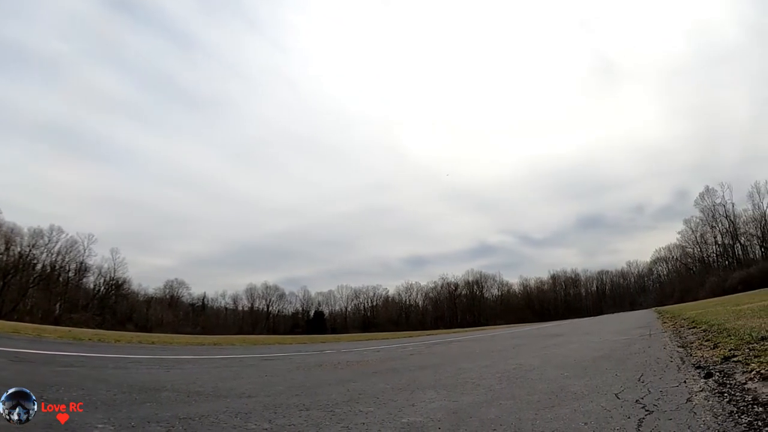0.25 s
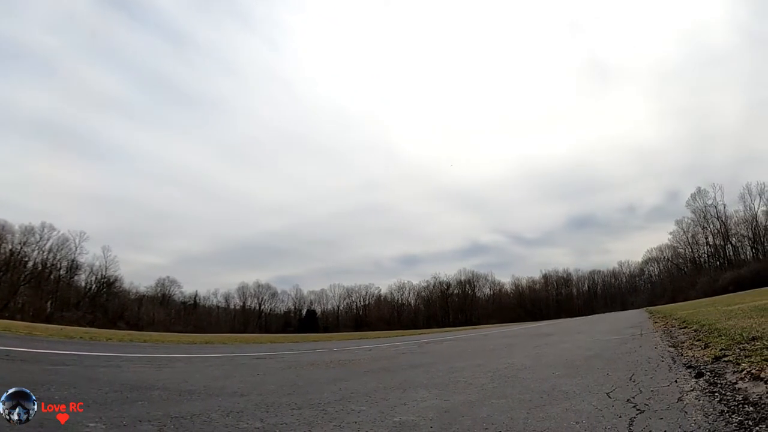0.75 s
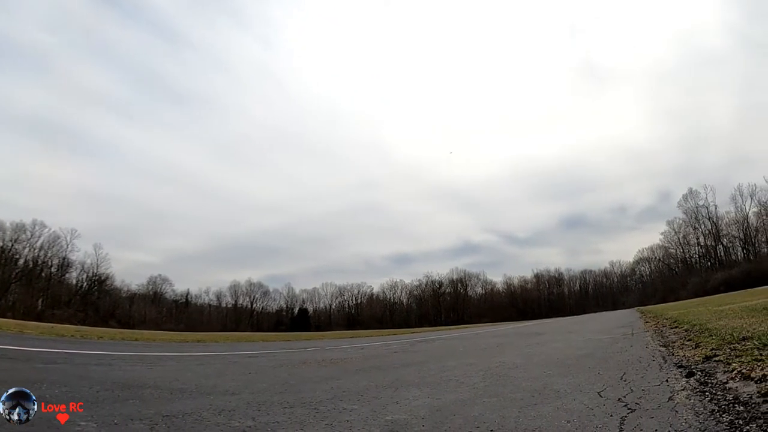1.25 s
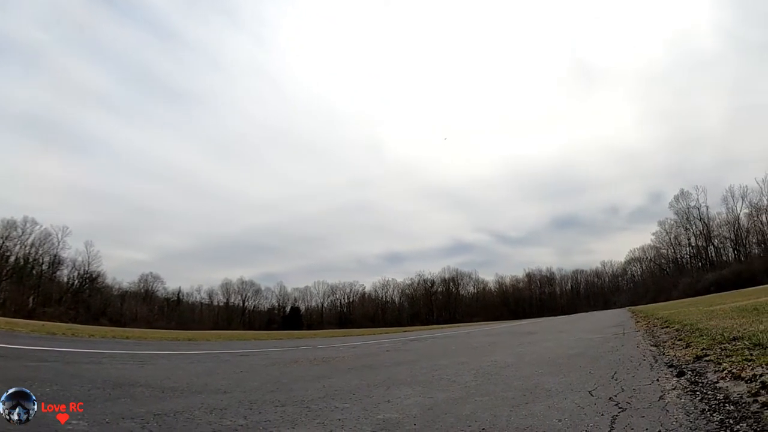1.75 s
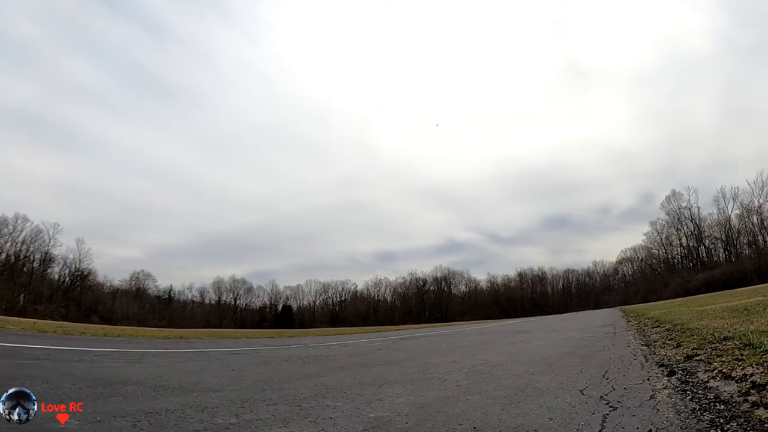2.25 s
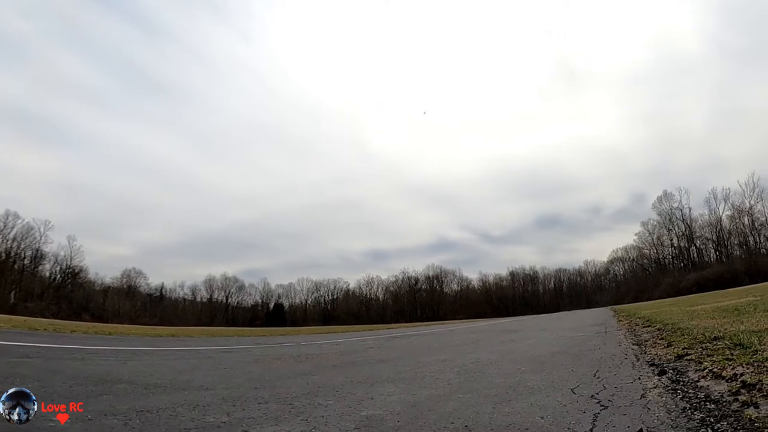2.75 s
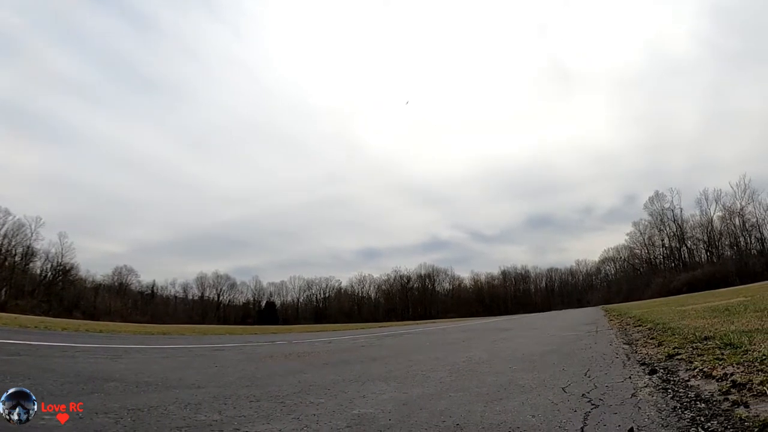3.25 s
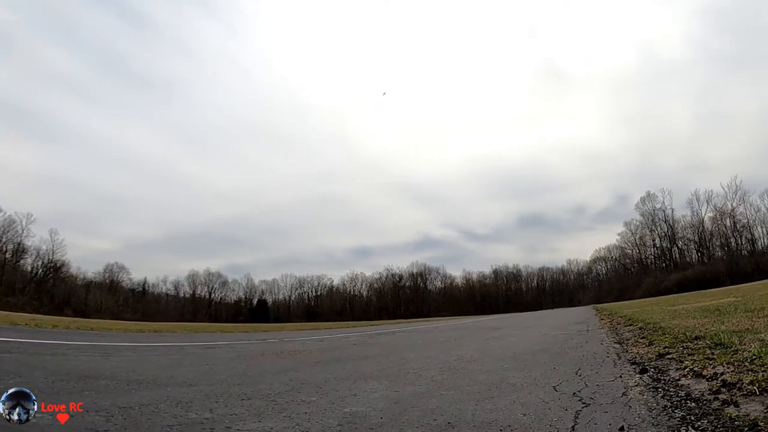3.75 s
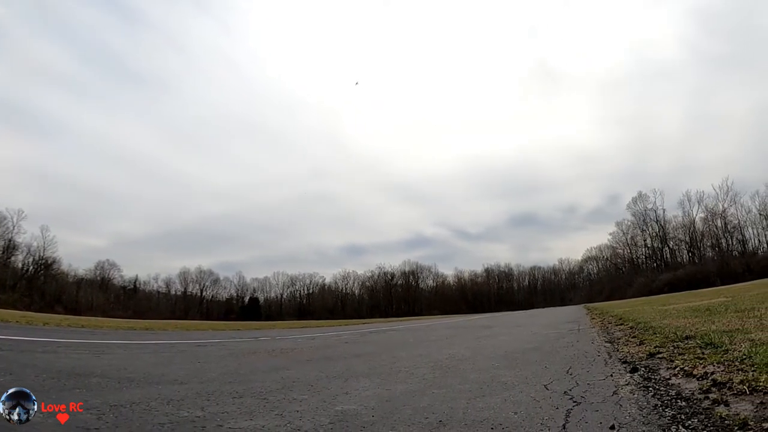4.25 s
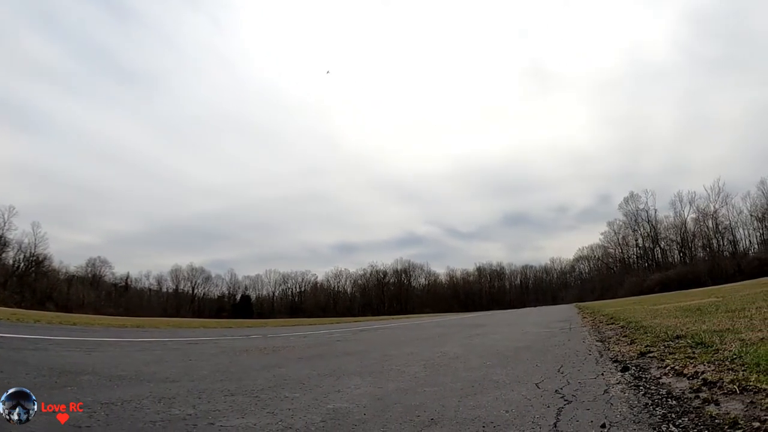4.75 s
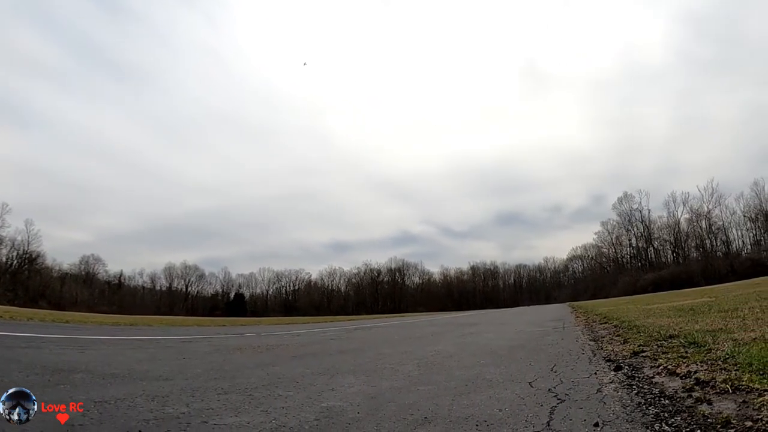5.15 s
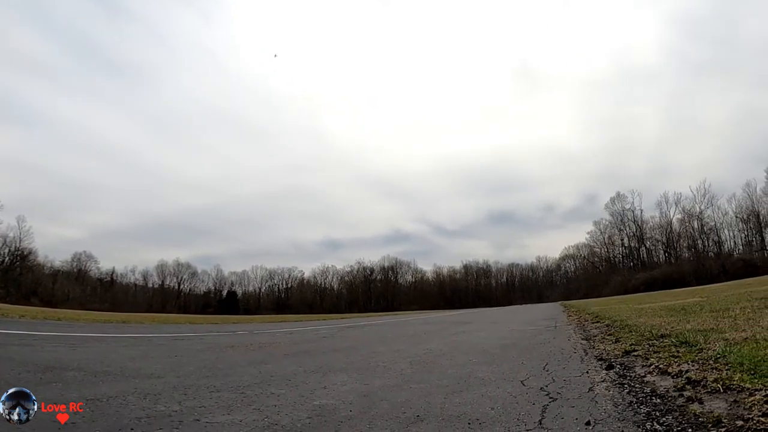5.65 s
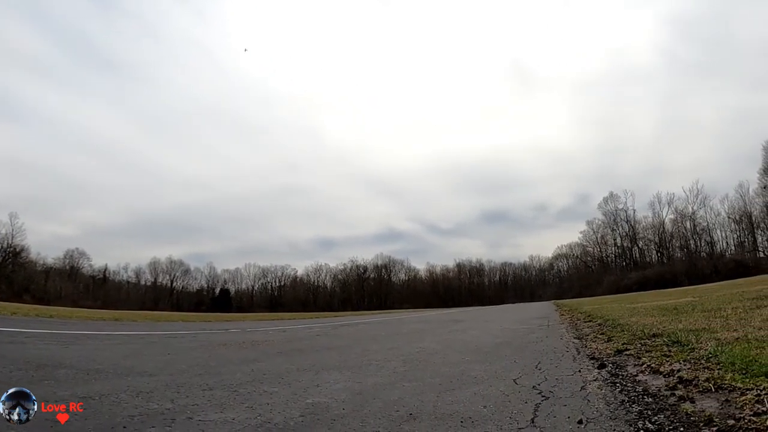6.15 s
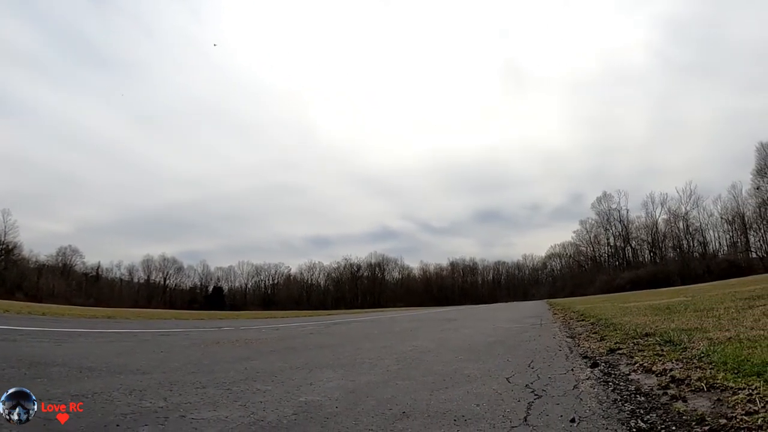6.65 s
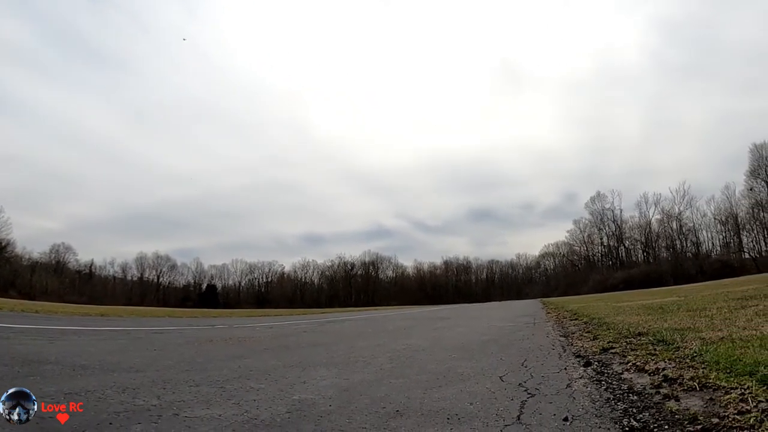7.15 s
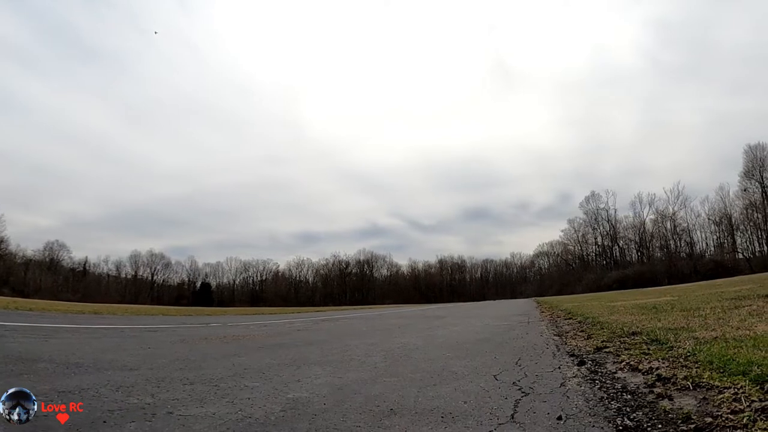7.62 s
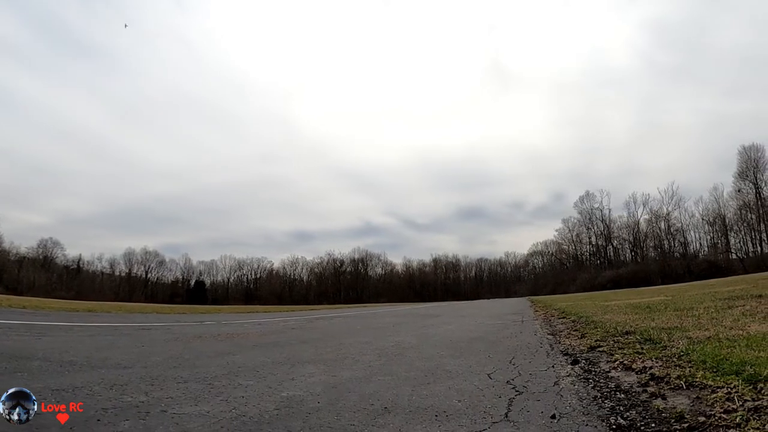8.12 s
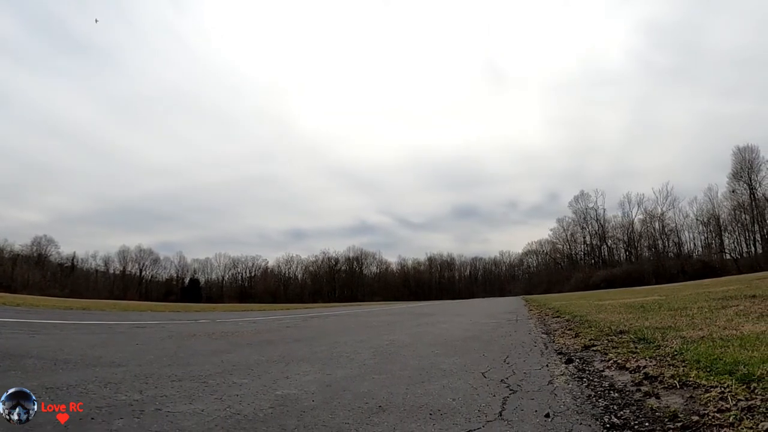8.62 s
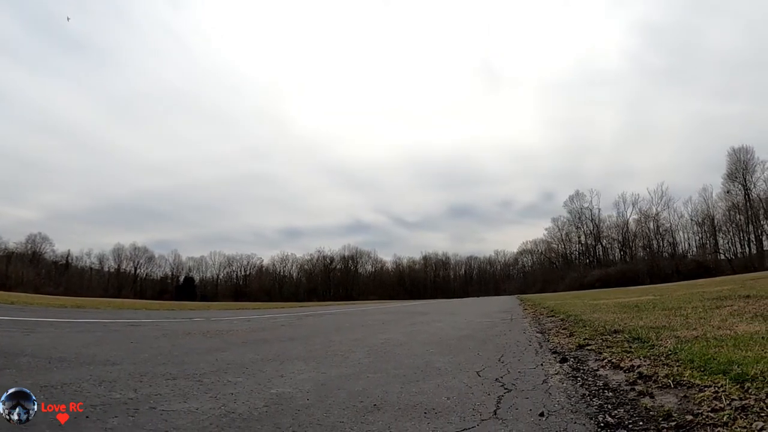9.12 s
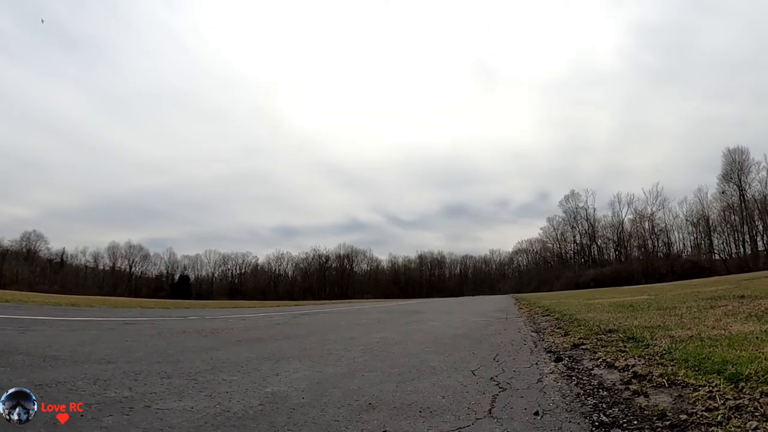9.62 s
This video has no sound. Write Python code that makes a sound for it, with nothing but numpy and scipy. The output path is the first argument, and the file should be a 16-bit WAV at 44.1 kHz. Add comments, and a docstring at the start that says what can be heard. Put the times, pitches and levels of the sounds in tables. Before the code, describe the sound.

Wind buffets the microphone over an open field as birds whistle, chip and trill, with a small electric aircraft whining faintly far overhead.

```python
"""Birds on a wide paved field edged by bare woods, on a gusty day: gliding tones that echo off road and trees.
One bird whistles falling and rising notes and sharp whips, another trills, a third gives a nasal call;
farther ones chip and chatter. A small electric aircraft whines far overhead as multiples of its shaft speed.
Bands of flickering noise make the roar and hiss of the air and the wind that buffets the microphone."""
import sys
import numpy as np
from scipy import signal
from scipy.io import wavfile
from scipy.ndimage import uniform_filter1d

SR = 44100
rng = np.random.default_rng(int(sys.argv[2]) if len(sys.argv) > 2 else 0)


def generate_wav(signal):
    """Clip the signal to [-1, 1] and save it as 16-bit WAV at the path in sys.argv[1]."""
    frames = np.transpose(np.atleast_2d(signal))
    scaled = np.clip(frames, -1, 1) * 32767
    pcm = np.round(scaled).astype(np.int16)
    wavfile.write(sys.argv[1], SR, pcm)


def linear_from_db(decibels):
    """Turn decibels (scalar or array-like) into linear amplitude factors; 0 gives 1."""
    return 10 ** (np.asarray(decibels, float) / 20)


N = 435694
SLOW_STEP = 64   # samples per value of a slow curve
PUFF_DEPTH_DB = 9.5   # fall from the middle of a hiss swell to its ends


def rms_one(x):
    """Scales to rms 1."""
    return x / np.sqrt(np.mean(x ** 2) + 1e-20)


def in_time(rows):
    """One sample-rate curve for each column after the time."""
    s, *columns = np.transpose(rows)
    return [np.interp(np.arange(N) / SR, s, c) for c in columns]


def stretched(slow):
    """A slow curve read at every sample."""
    return np.interp(np.arange(N) / SLOW_STEP, np.arange(len(slow)), slow)


def drift(pole_hz):
    """Slow chance curve: noise through a double one-pole low-pass; rms 1."""
    r = np.exp(-2 * np.pi * SLOW_STEP * pole_hz / SR)
    settle = 2000
    white = rng.standard_normal(N // SLOW_STEP + 2 + settle)
    return rms_one(signal.lfilter([1], [1, -2 * r, r * r], white)[settle:])


def bump(middle_s, half_s, depth_db):
    """Slow gain curve: 1 at its middle, depth_db lower half_s to either side."""
    s = np.arange(N // SLOW_STEP + 2) * SLOW_STEP / SR
    return linear_from_db(-depth_db * np.minimum(((s - middle_s) / half_s) ** 2, 10))


def banded_noise(spectrum, patchiness, pole_hz, count):
    """Log-spaced bands of noise, flickering partly together and partly alone; rms 1."""
    hz, db = np.transpose(spectrum)
    edges_hz = np.geomspace(hz[0], hz[-1], count + 1)
    together = drift(pole_hz)
    white = rng.standard_normal((2, N + SR // 4))
    out = 0
    for k, (low_hz, high_hz) in enumerate(zip(edges_hz, edges_hz[1:])):
        band_pass = signal.butter(2, [low_hz, high_hz], "band", fs=SR, output="sos")
        band = signal.sosfilt(band_pass, white[k % 2])[-N:]
        level_db = np.interp(np.log(low_hz * high_hz) / 2, np.log(hz), db)
        flicker_db = patchiness * (0.77 * together + 1.03 * drift(pole_hz))
        out = out + band * stretched(linear_from_db(level_db + flicker_db))
    return rms_one(out)


def evened(x):
    """Flattens the slow swings of a noise, so that only the gust sets its strength."""
    power = uniform_filter1d(uniform_filter1d(x ** 2, size=2500), size=2500)
    return x / np.sqrt(power + 0.016)


def glides(shape, notes):
    """Stretches a note shape over each length and pitch range."""
    return [[(start_s + share * length_s, from_hz + glide * (to_hz - from_hz), db + peak_db)
             for share, glide, db in shape]
            for start_s, length_s, from_hz, to_hz, peak_db in notes]


def repeated(shape, syllables):
    """Places a syllable shape at each time, level and pitch, fading where a rate is given."""
    return [[(at_s + s, hz * factor, db + peak_db - sum(fade) * s) for s, hz, db in voice]
            for at_s, peak_db, factor, *fade in syllables for voice in shape]


def add(out, note):
    """Adds one syrinx tone gliding through rows of time, pitch and rms dB; further columns are its partials."""
    rows = np.array(sorted(note), float)
    at = np.arange(max(int(rows[0, 0] * SR), 0), min(int(rows[-1, 0] * SR), N))
    hz = np.interp(at / SR, rows[:, 0], rows[:, 1])
    phase = 2 * np.pi * (np.cumsum(uniform_filter1d(hz, size=101)) / SR + rng.random())
    edge_s = 0.0018
    edges = np.minimum(1, np.minimum(at - at[0], at[-1] - at) / (edge_s * SR))
    for k, level_db in enumerate(rows.T[2:]):
        level = np.interp(at / SR, rows[:, 0], linear_from_db(level_db))
        out[at] += np.sqrt(2) * level * edges * np.sin((k + 1) * phase)


def sung(notes, shimmer_db, pole_hz):
    """Sums notes; turbulent air makes their level shimmer."""
    out = np.zeros(N)
    for note in notes:
        add(out, note)
    return out * stretched(linear_from_db(shimmer_db * drift(pole_hz)))


def aircraft():
    """Multiples of the shaft speed, each fading and fluttering by itself on the path through moving air."""
    # shaft, mostly easing down as it flies off: time_s, turns_per_s
    shaft_speed = [(0, 102.8), (.5, 103.2), (1.25, 104.7), (1.6, 104.27), (2, 102.5), (2.4, 101.36),
                   (3.3, 100.7), (3.9, 101.2), (4.1, 100.7), (4.56, 98.7), (4.7, 98.1), (4.95, 98.0),
                   (5.3, 96.55), (5.5, 96.2), (5.75, 96.1), (6.2, 96.75), (7.2, 95.95), (7.9, 96.05),
                   (8.9, 95.55), (9.4, 95.3), (9.5, 94.6), (9.58, 92.5), (9.7, 91.8), (9.88, 91.5)]
    # loudness on arrival: time_s, propeller_db, motor_db
    arriving = [(0, -82, -83), (.5, -85, -82.5), (1.2, -74.5, -84.5), (2.0, -77.5, -84.5), (2.4, -75, -83),
                (3.2, -76, -79), (3.6, -78, -83.5), (4.0, -78.5, -77), (4.4, -90, -80.5), (4.6, -79, -71),
                (5.0, -83.5, -71), (5.45, -76.5, -67), (5.7, -79.5, -73), (6.0, -84, -79.5),
                (6.8, -76.5, -77.5), (7.2, -76.5, -82), (8.0, -77, -81), (8.8, -85, -81.5),
                (9.35, -92, -86.5), (9.55, -80.5, -93), (9.88, -75.5, -85)]
    # steady shaft multiples: order, source (0 propeller, 1 motor), level_db against that source
    orders_heard = [(10.83, 0, -11.5), (12, 0, -4), (13, 0, -2), (14, 0, -10), (21.04, 1, -1)]
    # tones that come forward, then sink away: middle_s, half_length_s, order, peak_db
    swells = [(4.622, 0.74, 1.0, -55), (5.585, 0.62, 1.0, -56.5), (6.602, 0.6, 1.0, -51.5),
              (0.493, 1.3, 14.02, -82), (5.394, 0.15, 17.87, -78), (6.599, 1.3, 17.87, -80.5),
              (8.791, 0.63, 17.87, -85.5), (0.898, 1.1, 24, -92.5), (2.296, 1.97, 24, -80.5),
              (3.596, 0.87, 24, -100.5), (8.403, 0.74, 24, -92), (9.368, .15, 24, -78.5),
              (0.902, 0.63, 42, -84), (1.803, 0.65, 42, -80), (3.103, 0.94, 42, -92),
              (4.113, 0.33, 42, -85), (5.103, 0.89, 42, -86.5), (6.798, 0.83, 42, -83.5),
              (7.767, 0.27, 42, -81), (8.168, 0.15, 42, -79.5), (8.809, 0.41, 42, -87),
              (9.384, 0.17, 42, -81.5), (5.153, 0.58, 63, -92), (5.848, 0.22, 63, -98),
              (9.763, 0.13, 24, -77), (3.282, 0.32, 84, -98), (3.85, 0.15, 84, -102),
              (4.217, 0.2, 84, -88.5), (4.57, 0.081, 84, -87), (4.83, 0.18, 84, -89),
              (5.05, 0.097, 84, -84.5), (5.278, 0.13, 84, -89.5), (5.5, .08, 84, -90),
              (5.75, 0.18, 84, -93.5), (6.457, 0.77, 84, -93), (7.0, 0.24, 84, -90), (7.5, 0.41, 84, -96.5),
              (7.838, 0.078, 84, -89), (8.086, 0.15, 84, -91), (8.818, 0.32, 84, -91.5),
              (9.857, 0.21, 84, -83)]
    swell_depth_db = 16

    turns, = in_time(shaft_speed)
    phase = 2 * np.pi * np.cumsum(turns * (1 + .0004 * stretched(drift(6.0)))) / SR
    levels = linear_from_db(np.array(in_time(arriving)))

    def flutter(order):
        """Slow and fast level flutter; the slow part is deeper for higher orders."""
        return linear_from_db((1.2 + .025 * order) * drift(5.0) + 2.8 * drift(60.0))

    tones = 0
    for order, source, db in orders_heard:
        gain = levels[int(round(source))] * stretched(linear_from_db(db) * flutter(order))
        tones = tones + gain * np.sin(order * phase)
    for middle_s, half_s, order, db in swells:
        gain = stretched(linear_from_db(db) * bump(middle_s, half_s, swell_depth_db) * flutter(order))
        tones = tones + gain * np.sin(order * phase)
    # air torn by the blades: a noise band under the order-21 whine, swelling with the motor
    torn_air = levels[1] * stretched(drift(190.0)) * np.sin(18.5 * phase)
    return np.sqrt(2) * tones + torn_air


def rush():
    """A steady low roar under three overlapping bands of far air noise."""
    # rush of rotors and of air in the trees: time_s, rotors_db, trees_db
    rush_levels = [(0, -83, -77), (.45, -85, -78), (1.0, -81, -73), (1.7, -79.5, -76), (2.3, -82.5, -78.5),
                   (3.15, -82.5, -77.5), (3.7, -80, -75.5), (4.1, -79.5, -74), (4.5, -84.5, -76),
                   (5.3, -81, -75), (5.85, -85, -75.5), (6.4, -82.5, -71), (6.8, -80.5, -74.5),
                   (7.4, -83, -80.5), (8.1, -82.5, -77), (8.9, -83, -76), (9.45, -83.5, -76.5),
                   (9.88, -82.5, -77)]
    # short puffs of bright hiss: middle_s, half_length_s, level_db
    puffs = [(1.55, 0.14, -89), (1.82, 0.091, -78), (2.163, 0.085, -85), (2.52, 0.19, -82),
             (3.546, 0.032, -80.5), (3.756, 0.053, -76), (4.564, 0.055, -80.5), (5.036, .08, -86.5),
             (5.26, .09, -82), (5.493, 0.047, -89), (5.775, 0.088, -82.5), (6.623, 0.058, -80),
             (6.898, 0.1, -84.5), (8.176, .12, -82.5), (8.897, 0.072, -82), (9.417, 0.1, -76.5)]
    # spectra of far air over the woods, low, mid and bright rush: frequency_hz, density_db_per_hz (relative)
    roar_spectrum = [(100, -2.5), (140, -2), (167, -1), (200, -8), (265, -14.5), (360, -27.5), (485, -31),
                     (660, -32.5), (900, -36.5), (1100, -48.5)]
    low_spectrum = [(850, -18), (1000, 1.5), (1200, -4.5), (1400, -5.5), (1650, -8)]
    mid_spectrum = [(1450, -2), (1750, -4.5), (2200, 0.5), (2600, -3.5), (3000, -3.5), (3500, -9.5),
                    (4100, -19.5)]
    hiss_spectrum = [(3600, -8.5), (4200, 7), (4750, -3), (5500, 2), (6400, -2), (7500, -6), (8700, -9.5),
                     (9600, -18)]
    roar_db, low_mean_db = -54, -77
    low_follows = 0.6   # share of the rotors' swing in dB
    steady_hiss_db = -1.5   # hiss between the puffs, against the rotors

    rotors_db, trees_db = in_time(rush_levels)
    low_db = low_mean_db + low_follows * (rotors_db - rotors_db.mean())
    puff_power = sum((linear_from_db(db) * bump(middle_s, half_s, PUFF_DEPTH_DB)) ** 2 for middle_s, half_s, db in puffs)
    hiss_level = np.sqrt(linear_from_db(2 * (rotors_db + steady_hiss_db)) + stretched(puff_power))
    return (linear_from_db(roar_db) * banded_noise(roar_spectrum, patchiness=1.42, pole_hz=6.4, count=8)
            + linear_from_db(low_db) * banded_noise(low_spectrum, patchiness=2.5, pole_hz=4.1, count=4)
            + linear_from_db(trees_db) * banded_noise(mid_spectrum, patchiness=2.0, pole_hz=4.0, count=6)
            + hiss_level * banded_noise(hiss_spectrum, patchiness=1.5, pole_hz=10.0, count=6))


def wind():
    """Eddies push on the diaphragm: lumpy noise, deep thuds over a higher rumble, low-passed out of the mids."""
    # steady push on the microphone: time_s, level_db
    steady_push = [(0, -40), (.6, -40), (.75, -45), (1.26, -45), (1.5, -38), (2.25, -46), (2.65, -29.5),
                   (3.0, -55), (3.4, -40.5), (3.8, -42), (4.3, -51), (4.6, -44.5), (4.9, -39),
                   (5.45, -50.5), (5.6, -42), (6.1, -47), (6.6, -43.5), (7.0, -49), (7.9, -38),
                   (8.38, -49.5), (9.0, -36.5), (9.5, -38), (9.88, -38)]
    # single eddies: middle_s, half_length_s, thud_db, rumble_db
    buffets = [(0.311, 0.026, -30.5, -64), (0.484, 0.12, -36, -62.5), (1.068, 0.13, -35.5, -46),
               (1.347, 0.062, -38, -66), (1.624, 0.027, -38, -39.5), (1.846, 0.026, -28.5, -39.5),
               (2.072, 0.13, -26, -43), (2.36, 0.061, -29, -39), (2.488, 0.079, -26, -35.5),
               (2.772, 0.032, -27, -52), (2.887, 0.067, -31.5, -41.5), (3.208, 0.16, -31, -55),
               (3.597, 0.032, -33.5, -62), (3.862, 0.053, -33, -44.5), (4.05, 0.13, -37.5, -44),
               (4.35, 0.045, -35.5, -44.5), (5.07, 0.12, -30, -48), (5.234, 0.025, -33.5, -57),
               (5.34, 0.092, -38, -45.5), (5.758, 0.029, -36, -66), (6.291, 0.079, -39.5, -44.5),
               (7.191, 0.045, -32, -46), (7.316, 0.041, -33.5, -63), (7.449, 0.065, -31, -50),
               (7.688, 0.13, -31, -38.5), (8.213, 0.16, -38.5, -59), (8.49, 0.069, -32, -57),
               (8.593, 0.016, -31, -38.5), (8.697, 0.062, -34.5, -56), (8.837, 0.1, -32.5, -47.5),
               (8.985, 0.068, -24, -39), (9.1, 0.041, -22.5, -37), (9.32, 0.16, -34, -44),
               (9.622, 0.014, -26, -47), (9.719, 0.026, -27, -33.5)]
    # spectra: frequency_hz, density_db_per_hz (relative)
    thud_spectrum = [(16, 2), (22, 1), (36, -3), (55, -10.5), (75, -18), (100, -23.5)]
    rumble_spectrum = [(50, -14), (70, 6), (92, 1.5), (110, -8.5), (145, -5), (200, -24)]
    buffet_depth_db, cut_hz = 10, 187
    rumble_mean_db, rumble_follows = -48.5, 0.38   # follows: share of the steady push's swing in dB

    wind_db, = in_time(steady_push)
    hits = np.array([bump(middle_s, half_s, buffet_depth_db) for middle_s, half_s, _, _ in buffets])
    thud_power, rumble_power = linear_from_db(np.transpose(buffets)[2:]) ** 2 @ hits ** 2
    rumble_db = rumble_mean_db + rumble_follows * (wind_db - wind_db.mean())
    thud_level = np.sqrt(linear_from_db(2 * wind_db) + stretched(thud_power))
    rumble_level = np.sqrt(linear_from_db(2 * rumble_db) + stretched(rumble_power))
    push = (thud_level * evened(banded_noise(thud_spectrum, patchiness=3.5, pole_hz=3.6, count=4))
            + rumble_level * evened(banded_noise(rumble_spectrum, patchiness=0.0, pole_hz=2.9, count=4)))
    return signal.sosfilt(signal.butter(4, cut_hz, fs=SR, output="sos"), push)


def far_birds():
    """Fainter birds along the tree line, faint hoots and thin tones: short gliding tones."""
    # syllable shapes, each a list of voices: offset_s, pitch_hz, level_db (relative)
    chip = [
        [(-.008, 3120, -14), (.002, 3310, -1), (.009, 3270, 0), (.017, 3000, -6), (.025, 2650, -19)],
    ]
    arc = [
        [(0, 2750, -14), (.012, 3200, 2), (.03, 3680, -4), (.06, 3730, -9), (.1, 3640, -10), (.13, 3550, -20)],
    ]
    seep = [
        [(0, 5330, -16), (.01, 5250, -4), (.03, 5190, 0), (.045, 5140, -6), (.052, 5120, -20)],
    ]
    hook = [
        [(0, 2650, -14), (.006, 3200, -5), (.013, 3420, 0), (.022, 3440, -10)],
    ]
    # syllables sung: time_s, peak_db, pitch_factor; arcs also fade_db_per_s
    chips = [(.765, -70, .98), (1.055, -76, .98), (3.93, -75, .85), (5.045, -75, .98), (5.314, -73, 1.0),
             (5.578, -70, 1.0), (5.842, -70, 1.0), (6.365, -64, 1.0), (6.624, -63, 1.0), (6.888, -65, 1.0),
             (7.152, -65, 1.0), (7.418, -70, .99), (7.682, -71, .98), (7.944, -69, .98), (8.209, -76, .99),
             (8.478, -81, .98)]
    arcs = [(.358, -70, 1.0, 60), (.875, -83, .975, -30), (4.64, -78, .965, 0), (9.175, -78, .98, -50),
            (9.69, -79, 1.0, -40)]
    seeps = [(.095, -64.5, 1.0), (.266, -64, 1.0)]
    hooks = [(.015, -68, 1.0), (.188, -67, 1.0)]
    # glide shapes: length_share, glide_share, level_db (relative)
    slur = [(0, 0, -9), (.25, .27, -2), (.5, .55, 0), (.8, .82, -3), (1, 1, -9)]
    hoot = [(0, 1, -10), (.15, .7, -6), (.5, .1, -5), (.8, 0, 0), (1, .6, -12)]
    levelling = [(0, 0, -12), (.2, .7, -3), (.35, 1, 0), (.6, .95, -4), (1, .6, -13)]
    # slurs, low far hoots, whistles that rise and level off, thin high tones of unknown source:
    # start_s, length_s, from_hz, to_hz, peak_db
    slurs = [(.038, .024, 4200, 2800, -73), (.105, .053, 2450, 3000, -75), (.195, .045, 2400, 1780, -72),
             (.335, .03, 3760, 3550, -80), (.7, .045, 2500, 1800, -73), (1.22, .05, 2600, 1900, -70),
             (2.836, .014, 5200, 4950, -71), (2.85, .028, 3780, 3680, -72), (4.343, .032, 2850, 2350, -70),
             (4.605, .03, 1480, 1150, -70), (4.655, .03, 1400, 2050, -69), (4.755, .045, 3150, 1900, -77),
             (4.775, .02, 1300, 1900, -74), (4.85, .022, 1300, 2000, -73), (5.153, .02, 3330, 3650, -75),
             (5.16, .034, 3250, 2400, -71), (5.24, .05, 2200, 2550, -79), (5.21, .06, 3700, 3350, -81),
             (5.3, .05, 3000, 2600, -80), (5.405, .045, 2430, 2850, -75), (5.455, .022, 2900, 2700, -77),
             (5.478, .014, 3200, 2650, -78), (5.488, .034, 2430, 2000, -68), (5.575, .03, 3100, 2350, -73),
             (5.66, .032, 3050, 3700, -74), (5.936, .014, 3330, 3380, -70), (5.948, .014, 2750, 2000, -66),
             (6.01, .045, 2500, 1950, -70), (7.385, .02, 2500, 2510, -76), (8.005, .045, 5000, 5090, -78),
             (8.44, .022, 3170, 3200, -79), (9.38, .04, 2900, 2520, -74), (9.465, .03, 2750, 3150, -66),
             (9.485, .03, 3300, 3600, -72), (9.515, .07, 2600, 1700, -68), (9.605, .065, 2250, 1600, -74)]
    hoots = [(5.42, .22, 615, 640, -78), (7.08, .175, 405, 430, -65), (7.98, .32, 740, 755, -83),
             (8.42, .43, 760, 790, -83), (9.17, .33, 790, 775, -80)]
    level_whistles = [(4.22, .08, 3540, 3740, -80), (4.705, .1, 3560, 3735, -83)]
    thin_tones = [(3.7, .11, 7940, 7890, -89), (4.08, .18, 7860, 7830, -93), (4.95, .65, 7790, 7950, -92)]

    syllables = repeated(chip, chips) + repeated(arc, arcs) + repeated(seep, seeps) + repeated(hook, hooks)
    gliding = (glides(slur, slurs) + glides(hoot, hoots) + glides(levelling, level_whistles)
               + glides(slur, thin_tones))
    return sung(syllables + gliding + chatter(), shimmer_db=2.6, pole_hz=30.0)


def chatter():
    """Notes of fast burry chatter: each blip is a short glide, up or down, at a random pitch."""
    # bursts: start_s, end_s, blips_per_s, lowest_hz, highest_hz, level_db
    bursts = [(4.61, 4.74, 260.0, 1050, 2000, -69), (5.935, 6.015, 450.0, 2150, 3050, -71),
              (5.99, 6.06, 400.0, 1550, 2500, -72)]
    notes = []
    for start_s, end_s, per_s, low_hz, high_hz, level_db in bursts:
        for s in np.arange(start_s, end_s, 1 / per_s):
            late, pitch, glide, loud = rng.random(4) - [0.0054, 0, 0.42, 0]
            hz = low_hz + pitch * (high_hz - low_hz)
            s = s + late / per_s / 2
            peak_db = level_db - 5.0 * loud
            notes.append([(s, hz * (1 - 0.22 * glide), peak_db - 0.5),
                          (s + 0.0041, hz, peak_db),
                          (s + 0.011, hz * (1 + 0.25 * glide), peak_db - 22)])
    return notes


def woods(x):
    """First echoes, then the diffuse scatter of trunks: dying noise, slow to build."""
    # first echoes off the road and the tree line: delay_s, level_db
    echoes = [(.013, -24), (.024, -17), (.043, -24)]
    near_t60_s, far_t60_s = .3, 1.0
    far_db = -15   # tail of the far tree line, against the near scatter
    scatter_db, cut_hz = -11.5, 11000
    build_s, smear_s = 0.0089, .004   # rough ground and bark smear each echo

    t = np.arange(int(.8 * SR)) / SR
    decay = linear_from_db(-60 * t / near_t60_s) + linear_from_db(far_db - 60 * t / far_t60_s)
    response = rng.standard_normal(len(t)) * decay * np.clip(t / build_s, 0, 1)
    response *= linear_from_db(scatter_db) / np.sqrt(np.sum(response ** 2))
    for delay_s, db in echoes:
        smear = rng.standard_normal(int(smear_s * SR))
        response[int(delay_s * SR):][:len(smear)] += linear_from_db(db) * smear / np.sqrt(np.sum(smear ** 2))
    dulled = signal.sosfilt(signal.butter(2, cut_hz, fs=SR, output="sos"), response)
    return signal.fftconvolve(x, dulled)[:N]


def whistler():
    """The near whistler, close and clear: pure gliding tones and sharp upward whips."""
    # glide shapes: length_share, glide_share, level_db (relative)
    fall = [(0, 0.014, -14.5), (.12, 0.088, -2), (.4, .48, -1), (.72, 0.74, -9), (.94, 0.91, -12.5),
            (1, 0.94, -25.5)]
    held = [(0, 0, -7), (.15, 0.18, 0), (.6, 0, 0.5), (.85, .8, -0.5), (1, 1, -21)]
    # falling notes and one short peep: start_s, length_s, from_hz, to_hz, peak_db
    falls = [(0.253, 0.13, 2060, 1417, -54), (0.887, 0.11, 1922, 1355, -55),
             (7.385, 0.14, 2186, 1440, -58.5), (8.114, .127, 2060, 1460, -54),
             (8.721, 0.11, 2044, 1370, -54.5)]
    peeps = [(9.196, 0.032, 2383, 2500, -55)]
    # rising notes with small steps, one list each: time_s, pitch_hz, level_db
    rises = [
        [(0.394, 1880, -80), (0.402, 1900, -65), (0.428, 1957, -60.5), (0.474, 1945, -56.5),
         (0.552, 2160, -55.5), (0.614, 2336, -50.5), (0.676, 2620, -49), (0.726, 2720, -51.5),
         (0.742, 2760, -57.5), (0.752, 2712, -73)],
        [(7.528, 1960, -82.5), (7.536, 2005, -71), (7.558, 2000, -61.5), (7.614, 2060, -57), (7.658, 2090, -56),
         (7.73, 2274, -55), (7.758, 2411, -57), (7.82, 2670, -55), (7.878, 2855, -54.5), (7.89, 2890, -59.5),
         (7.904, 2770, -78)],
        [(8.26, 1950, -76.5), (8.266, 1940, -67), (8.288, 1946, -61), (8.336, 1974, -53.5), (8.458, 2240, -52),
         (8.55, 2687, -57), (8.578, 2700, -57), (8.592, 2719, -71)],
    ]
    # whip shape, a list of voices: offset_s, pitch_hz, level_db (relative)
    whip = [
        [(-.085, 1298, -32.5), (-.045, 1546, -19), (-.02, 1707, -8.5), (-.005, 1833, -2.5), (.004, 1973, -1),
         (.007, 2220, 1.5), (.012, 2690, 1), (.017, 3240, -31), (.02, 3200, -22.5)],
        [(.021, 3220, -29), (.023, 3330, -9), (.028, 3870, -12), (.031, 4250, -16.5)],
    ]
    # whips sung: time_s, peak_db, pitch_factor
    whips = [(1.294, -51, 0.98), (9.047, -50.5, 0.99), (9.441, -50.5, 0.98), (9.829, -50.5, 1.0)]
    notes = glides(fall, falls) + list(rises) + glides(held, peeps) + repeated(whip, whips)
    return sung(notes, shimmer_db=1.3, pole_hz=25.0)


def airy_band():
    """A few soft swells of narrow hiss."""
    # swells: middle_s, half_length_s, level_db
    airy_swells = [(1.15, .25, -85), (1.55, .14, -79), (1.85, .16, -80), (2.15, .1, -86)]
    # spectrum: frequency_hz, density_db_per_hz (relative)
    spectrum = [(4900, 0.5), (5600, 1), (6300, -6.5)]
    swells = sum(linear_from_db(db) * bump(middle_s, half_s, PUFF_DEPTH_DB) for middle_s, half_s, db in airy_swells)
    return stretched(swells) * banded_noise(spectrum, patchiness=1.5, pole_hz=9.0, count=3)


def nasal_caller():
    """Three partials through the throat: the second grows as the beak opens, the third fades at high pitch."""
    # call: time_s, pitch_hz, first_db (before the throat's cut), second_db (against first_db)
    call = [(2.836, 1840, -64, -4), (2.842, 1640, -55.5, -9), (2.85, 1864, -55, -5.5),
            (2.856, 2436, -62, -13), (2.863, 2507, -67, -1), (2.872, 2460, -61.5, -12),
            (2.878, 2037, -53, -20), (2.891, 1970, -57.5, -8), (2.91, 1750, -58, 1), (2.939, 1642, -60, 7),
            (2.974, 1498, -64.5, 8.5), (2.981, 1202, -71, 15.5), (2.989, 1040, -72, 10),
            (3.008, 1046, -75, 11.5), (3.02, 1060, -86, 9)]
    third_db, third_fades_hz, third_fade_db_per_khz = -8, 3200, -20   # third_db: against the second
    throat_low_hz, throat_cut_db_per_khz = 1450, -78   # lower first partials hardly get out

    s, hz, first_db, second_db = np.transpose(call)
    third_db = second_db + third_db + third_fade_db_per_khz * np.maximum(3 * hz - third_fades_hz, 0) / 1000
    low_cut_db = throat_cut_db_per_khz * np.maximum(throat_low_hz - hz, 0) / 1000
    note = list(zip(s, hz, first_db + low_cut_db, first_db + second_db, first_db + third_db))
    return sung([note], shimmer_db=1.3, pole_hz=25.0)


def triller():
    """The trill, sung from among the trunks: one several-voiced syllable repeated."""
    # syllable shape, a list of voices: offset_s, pitch_hz, level_db (relative)
    trill_note = [
        [(-.03, 2150, -19), (-.018, 2210, -8), (-.008, 2340, -2), (-.001, 2600, -9), (.006, 3080, -4),
         (.011, 3340, 2), (.015, 3290, 2.5), (.019, 2950, 1.5), (.023, 2400, -2), (.028, 1750, -12)],
        [(-.004, 3560, -18), (0, 3780, -7), (.005, 3900, -3), (.01, 3820, -6), (.014, 3550, -20)],
        [(-.022, 4260, -36), (-.014, 4440, -27), (-.006, 4750, -32)],
        [(-.01, 4420, -34), (.01, 4450, -28), (.05, 4380, -30), (.075, 4350, -39)],
    ]
    # syllables sung: time_s, peak_db, pitch_factor
    trill = [(6.069, -59, .995), (6.193, -58, 1.0), (6.315, -55.5, .998), (6.439, -55.5, 1.003),
             (6.562, -55, 1.015), (6.686, -56, 1.025), (6.819, -58.5, .982), (6.959, -57, .968),
             (7.09, -60, .955)]
    return sung(repeated(trill_note, trill), shimmer_db=1.1, pole_hz=36.0)


def sinking_tone():
    """A faint, blurred low tone of two partials: its level wavers fast as the pitch falls."""
    # tone, before the 2 dB cut below: time_s, pitch_hz, first_db, second_db
    tone = [(9.19, 310, -84, -84), (9.25, 345, -74, -75), (9.33, 336, -78, -75), (9.38, 315, -72, -72),
            (9.42, 280, -78, -76), (9.46, 225, -84, -73), (9.51, 172, -90, -74)]
    return linear_from_db(-2) * sung([tone], shimmer_db=3.5, pole_hz=25.0)


def scene():
    """Birds with their echoes (the triller wettest), aircraft, air and wind."""
    near = whistler() + nasal_caller()
    trill, far = triller(), far_birds()
    echoes = woods(linear_from_db(-2.5) * near + linear_from_db(5.5) * trill + linear_from_db(1.0) * far)
    birds = near + trill + far + echoes
    return (birds + sinking_tone() + airy_band() + aircraft() + rush() + wind())[None]


def low_pass(x):
    """Removes everything above the highest recorded frequency."""
    return signal.sosfilt(signal.butter(12, 9130, fs=SR, output="sos"), x)


def record(dry):
    """The microphone adds its own faint noise."""
    self_noise_db = -99.0
    mix = dry + linear_from_db(self_noise_db) * rng.standard_normal(dry.shape)
    return low_pass(mix)


dry = scene()
out = record(dry)
generate_wav(out)
```